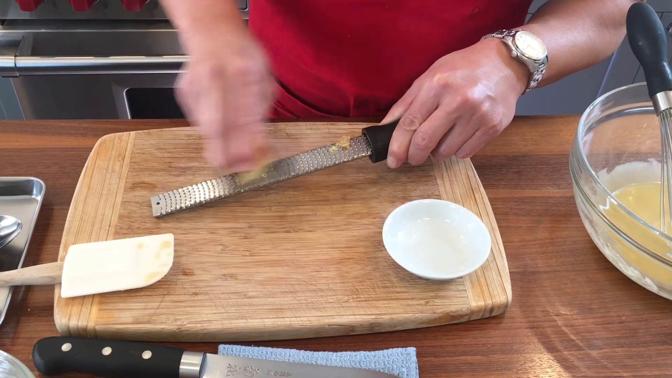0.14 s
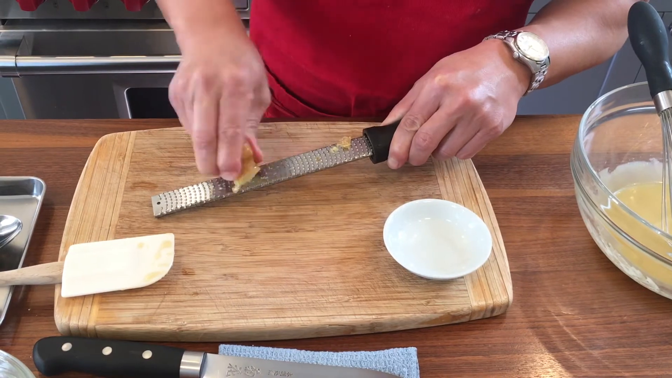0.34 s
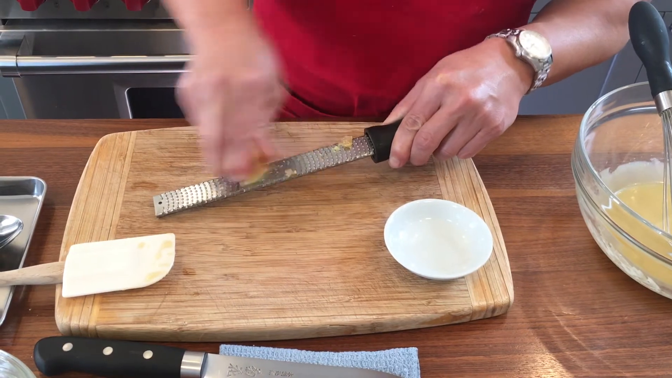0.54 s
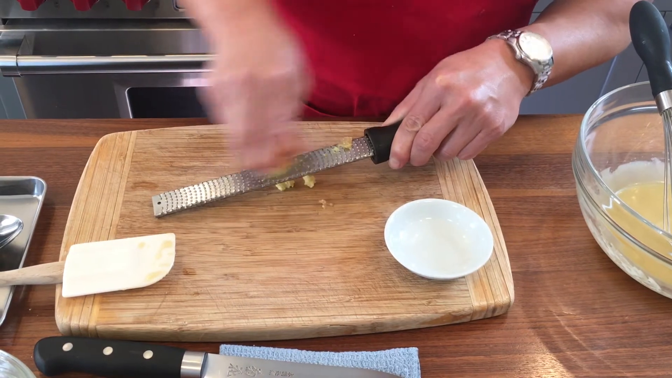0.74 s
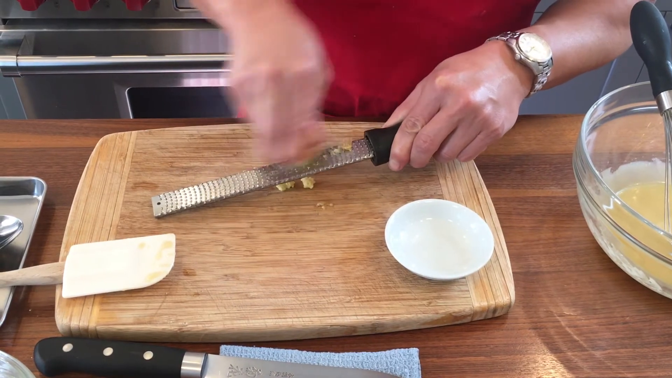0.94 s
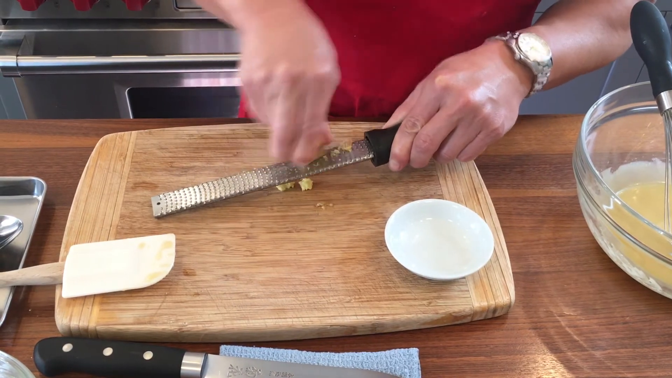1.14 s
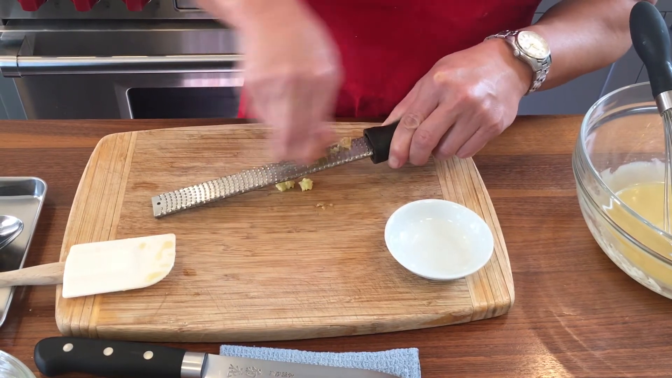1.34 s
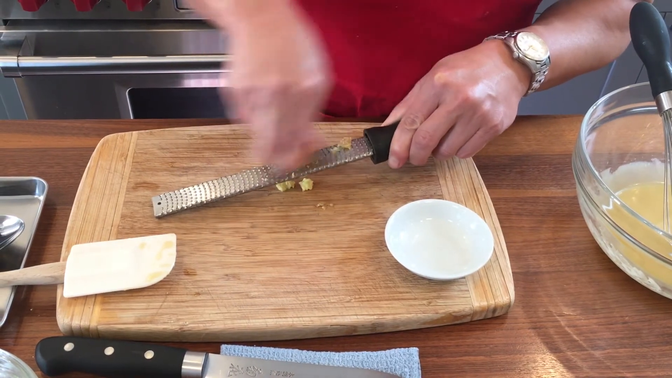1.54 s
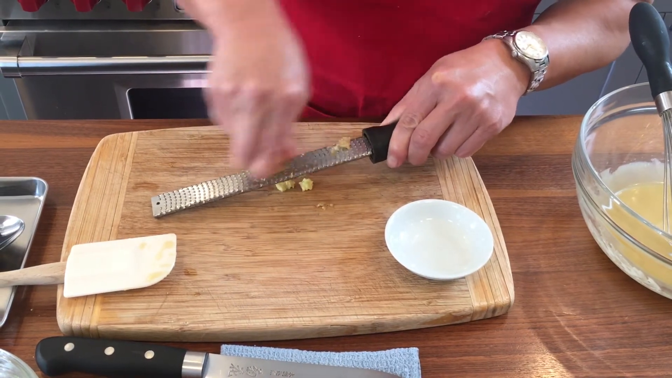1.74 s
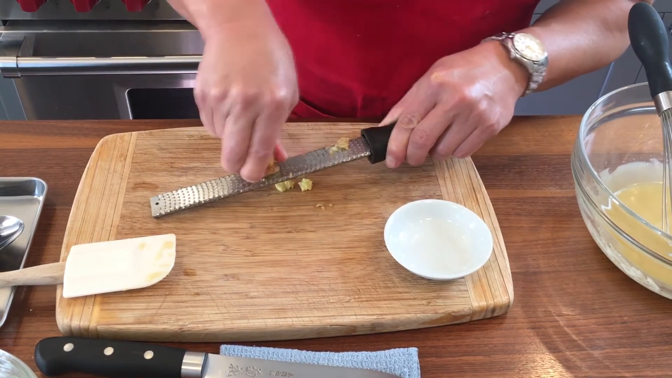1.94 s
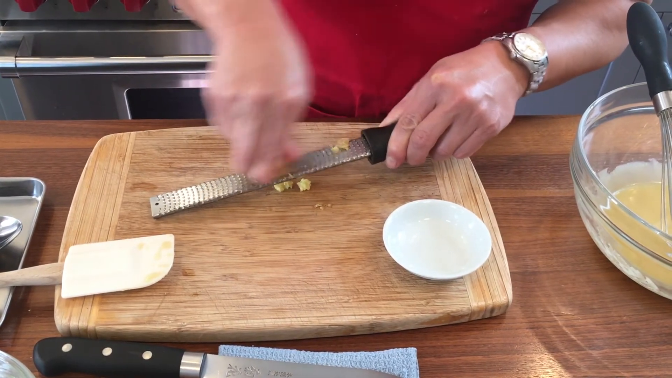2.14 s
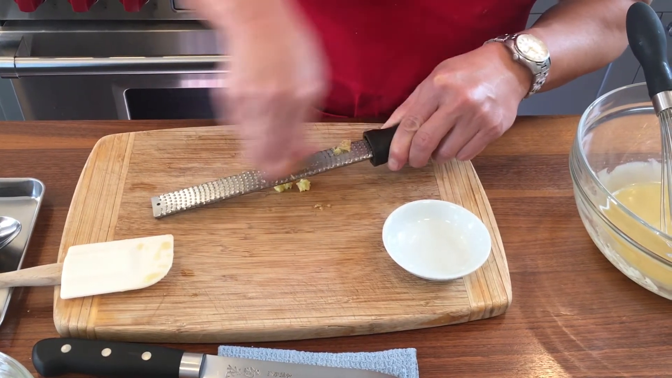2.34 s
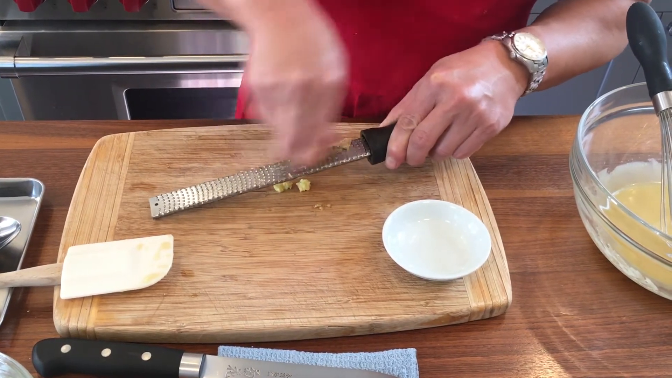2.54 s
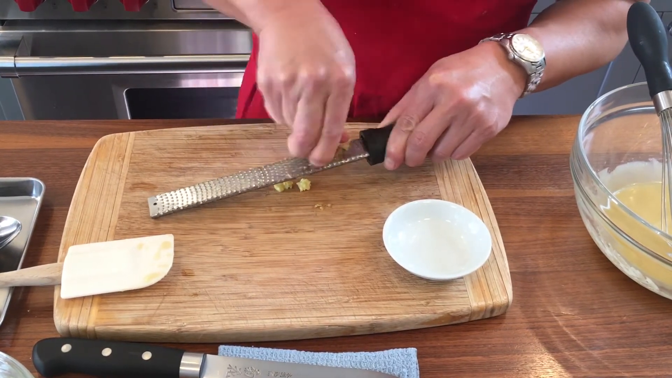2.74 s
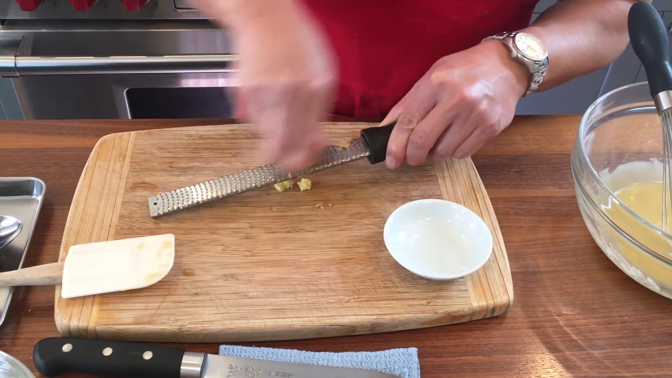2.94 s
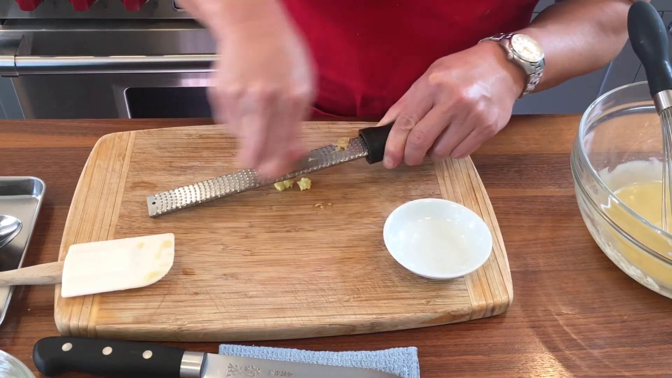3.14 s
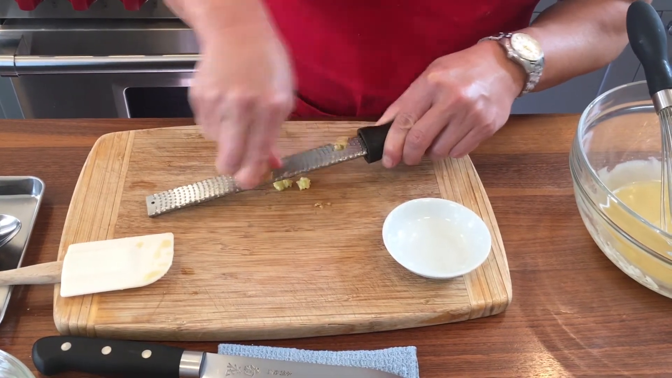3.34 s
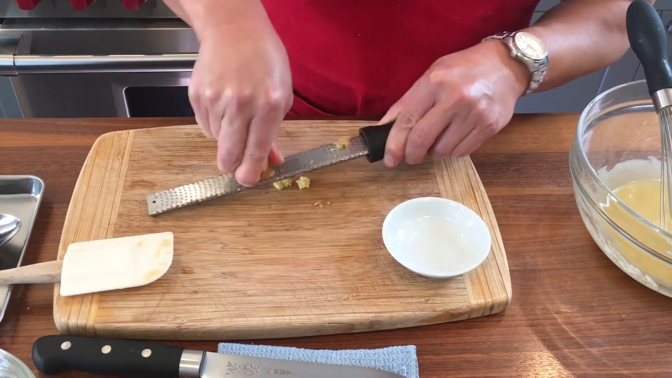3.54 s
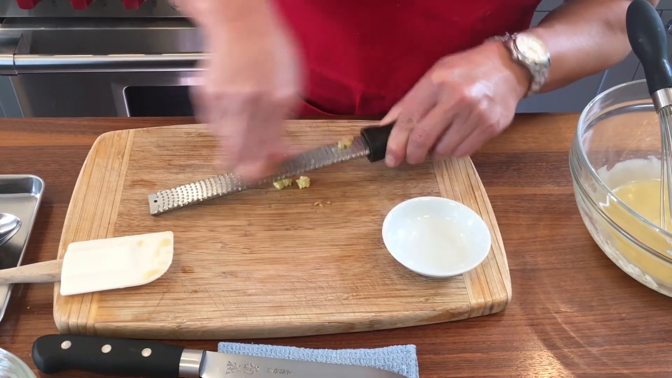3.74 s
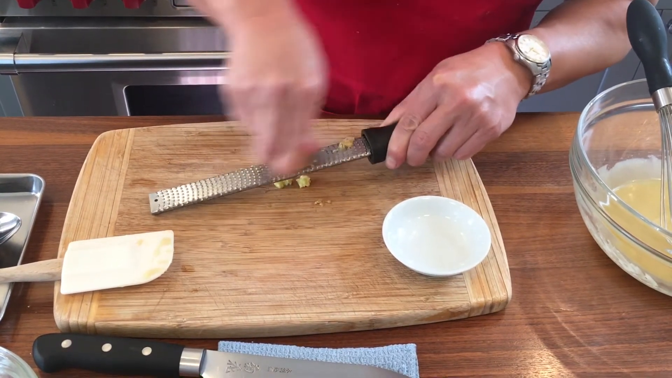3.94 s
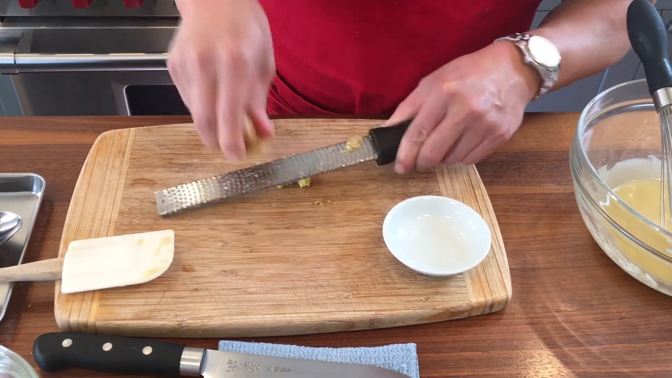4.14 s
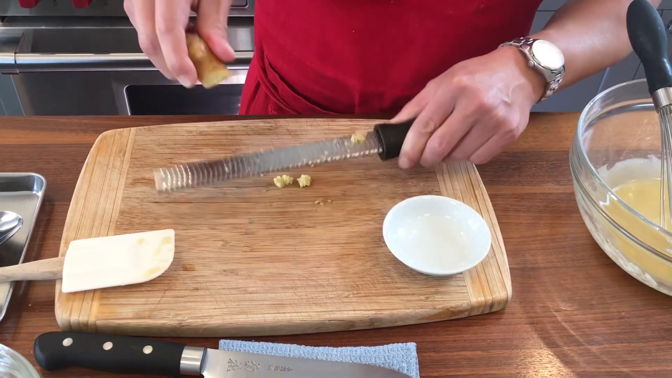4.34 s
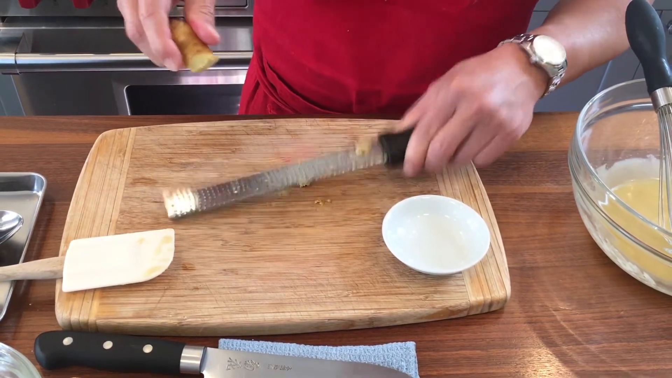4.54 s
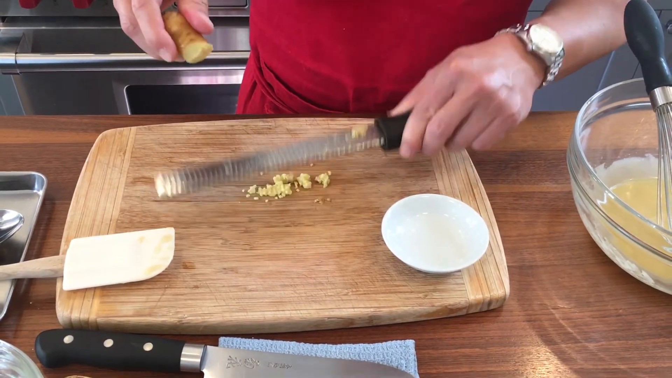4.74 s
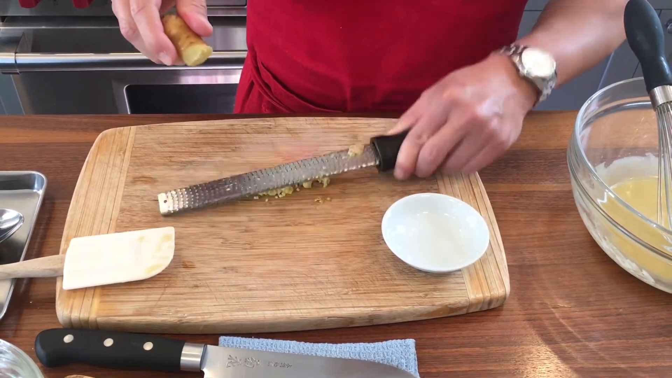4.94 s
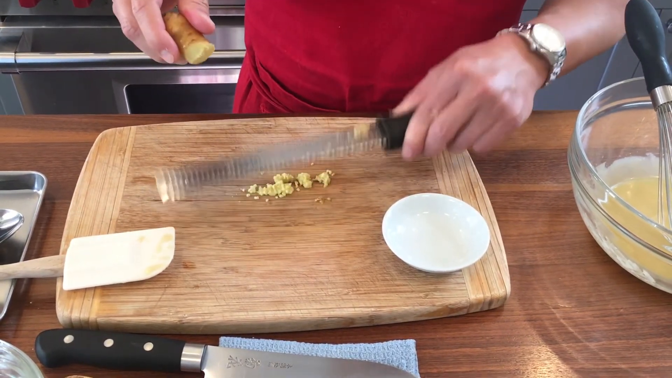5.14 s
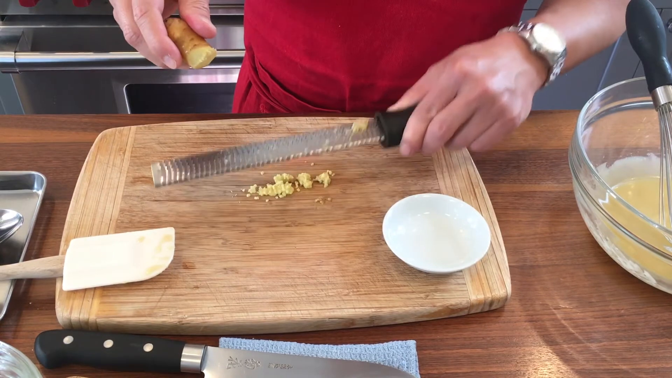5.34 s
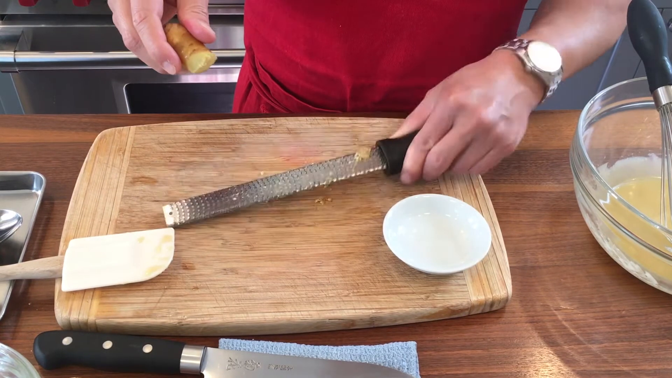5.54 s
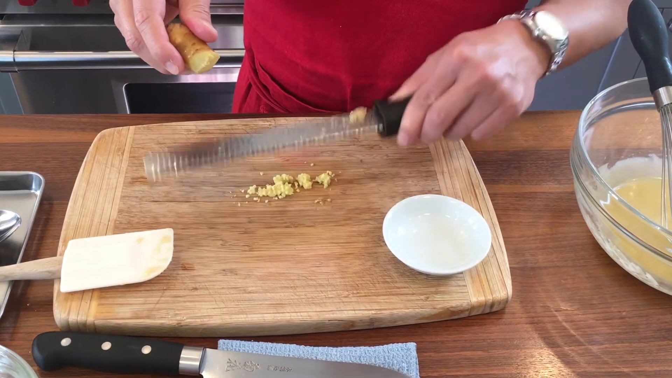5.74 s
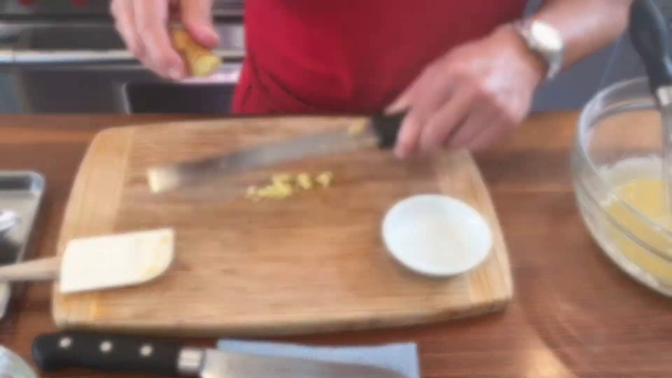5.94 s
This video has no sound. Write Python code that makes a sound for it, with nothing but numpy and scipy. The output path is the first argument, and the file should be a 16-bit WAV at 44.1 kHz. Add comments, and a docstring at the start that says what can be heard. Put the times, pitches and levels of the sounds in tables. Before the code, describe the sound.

Close in a small, reflective kitchen with a faint hum and soft air noise, ginger is rubbed quickly back and forth on a metal rasp resting on a wooden board. Bright crunchy pushes alternate with duller returns, about four or five pushes a second. The rubbing stops, then six much louder knocks of the steel blade on wood follow, clattery and briefly ringing, ending in a low handle bump.

```python
"""A low hum and soft air noise fill a small, live kitchen throughout.
A knob of ginger is rubbed back and forth on a steel rasp grater whose tip rests on a wooden board:
random clicks of snapping fibres, filtered, make a bright crunch on each push, a duller one on each return.
Late in the rubbing one tough fibre ticks, and then the ginger brushes the blade as it is lifted off.
Six knocks (dying sines, noise bursts, wall echoes) shake the pulp off; last the handle bumps the board."""
import sys
import numpy as np
from scipy import signal
from scipy.fft import rfft, irfft
from scipy.io import wavfile
from scipy.ndimage import uniform_filter1d

SR = 44100
rng = np.random.default_rng(int(sys.argv[2]) if len(sys.argv) > 2 else 0)


def to_wav(sig):
    """Store sig (one row per channel, or 1-D mono) as 16-bit WAV at the path in sys.argv[1].

    Samples outside -1..1 are clipped; the rate is SR.
    """
    pcm = np.clip(np.atleast_2d(sig), -1, 1) * 32767
    pcm = np.round(pcm).astype(np.int16)
    wavfile.write(sys.argv[1], SR, pcm.T)  # frames by channels


N = 269010  # length in samples, about 6.1 s

# Colour of snapping fibres. Each row: pitch in Hz, relative level in dB.
FIBRE_COLOUR = [(3000, -19), (4300, -0.5), (5100, -3), (6000, 1), (7200, 0), (8100, -5.5), (9200, -1),
                (10400, -11.5), (12000, -3.5), (16000, -6.5)]
# Ringing pitches of the board on the counter.
# Each row: pitch in Hz, relative level in dB, time to die by 60 dB in seconds.
BOARD_MODES = [(87.4, -10.5, 0.08), (116.7, -13.5, 0.095), (139, -6, 0.14), (188.6, -1, 0.08),
               (296, -10.5, 0.049), (481, -4.5, 0.025)]


def amp(db):
    """Turns decibels into a plain gain."""
    return 10 ** (np.asarray(db) / 20)


def unit(x):
    """Scales a sound to an rms (average strength) of 1."""
    return x / np.sqrt(np.mean(x ** 2) + 1e-20)


def read(points, hz):
    """Reads a table of pitch and value between its points, on a log-frequency axis."""
    f, value = np.transpose(points)
    return np.interp(np.log(hz + 1), np.log(f + 1), value)


def add(mix, s, sound):
    """Mixes a sound in at s seconds, cutting off what runs past the end."""
    part = mix[max(round(s * SR), 0):][:len(sound)]
    part += sound[:len(part)]


def colour(x, points, peaks=(), size=4096):
    """Filters with a broad spectrum and resonant peaks; the filter has unit energy and no pre-echo."""
    hz = abs(np.fft.fftfreq(size, 1 / SR))
    db = read(points, hz)
    for f, width, lift in peaks:
        db = db + lift / (1 + (2 * (hz - f) / width) ** 2)
    # minimum phase: the response starts at once and puts its energy as early as it can
    spectrum = np.exp(np.conj(signal.hilbert(np.log(amp(db)))))
    taps = np.fft.ifft(spectrum).real[:size // 2]
    return signal.oaconvolve(x, taps / np.linalg.norm(taps))[:len(x)]


def resonate(x, hz, width):
    """A resonance of gain 1, width in Hz, whose pitch follows the curve hz."""
    turn = np.exp(2j * np.pi * np.cumsum(hz * np.ones(len(x))) / SR)
    r = np.exp(-np.pi * width / SR)
    # shift the pitch down to zero, smooth, and shift it back up
    smooth = signal.lfilter([1 - r], [1, -r], x / turn + 1e-18)
    return 2 * (turn * smooth).real


def wander(length, per_s):
    """Random drift: straight lines between per_s random values a second."""
    return np.interp(np.arange(length) * per_s / SR, np.arange(4096), rng.standard_normal(4096))


def ring(modes, t, detune=0.):
    """A struck body's dying sines, each with a random sign and, where detune is set, a slightly random pitch."""
    signs = rng.choice([-1, 1], len(modes))
    shifts = 1 + detune * rng.standard_normal(len(modes))
    total = 0
    for (hz, db, t60), sign, shift in zip(modes, signs, shifts):
        fading = amp(db - 60 * t / t60)
        total = total + sign * fading * np.sin(2 * np.pi * hz * shift * t)
    return total


def chatter(t, length_s):
    """A quick run of contacts along the blade, of unit energy, driving all pitches about equally."""
    burst = rfft(rng.standard_normal(len(t)) * t * np.exp(-2 * t / length_s))
    # every pitch equally strong, phases kept; the fade below trims the spread in time
    flat = burst / (abs(burst) + 1e-12)
    even = irfft(flat, len(t)) * np.exp(-(t / (4 * length_s)) ** 2)
    return even / np.linalg.norm(even)


def background():
    """Low ventilation noise is filtered random noise; an appliance hum is a sine that wavers."""
    # Colour of the still air. Each row: pitch in Hz, relative level in dB.
    air_colour = [(20, -11.5), (35, -4), (55, 1.5), (85, -9.5), (120, -4.5), (190, 1.5), (260, -7.5),
                  (400, -7.5), (520, -15.5), (750, -22), (1300, -20.5), (2500, -28.5), (6000, -35),
                  (15000, -41.5)]
    air_db, hum_hz, hum_db = -65, 122.3, -71  # centres of the drifts
    air = amp(air_db) * unit(colour(rng.standard_normal(N), air_colour))
    air = air * amp(0.86 * wander(N, per_s=17))
    phase = 2 * np.pi * hum_hz * np.arange(N) / SR + 0.48 * wander(N, per_s=3.54)
    hum = np.sqrt(2) * np.sin(phase)
    return air + hum * amp(hum_db + 1.4 * wander(N, per_s=4.8))


def kitchen(x, wet_db, gap_s=.005):
    """Adds dense wall reflections after a short gap, each pitch band dying at its own speed."""
    # Echo length. Each row: pitch in Hz, time to die by 60 dB in seconds.
    echo_times = [(100, 0.44), (300, 0.2), (700, 0.54), (1300, 0.36), (2500, 0.42), (5000, 0.35),
                  (9000, 0.27), (15000, 0.25)]
    # How much the walls return. Each row: pitch in Hz, relative level in dB.
    wall_levels = [(100, -0.5), (600, 3.5), (1300, 0.5), (2500, 1.5), (3500, -2.5), (6000, -8.5),
                   (14000, -5.5)]
    reflections = rng.choice([-1., 1.], SR) * (rng.random(SR) < 12000 / SR)
    hz, t, bands = signal.stft(reflections, SR, nperseg=256)
    fade = amp(-60 * t / read(echo_times, hz)[:, None])
    returned = amp(read(wall_levels, hz))[:, None]
    tail = signal.istft(bands * fade * returned, SR, nperseg=256)[1]
    out = x.copy()
    add(out, gap_s, amp(wet_db) * signal.oaconvolve(x, tail / np.linalg.norm(tail)))
    return out


def knock(level_db, crack_db, thump_db, clack_db, hz, lift_db, rebound_s, rebound_db):
    """The blade slaps down along its length, rings, rebounds once and buzzes against the wood."""
    # Ringing pitches of the grater.
    # Each row: pitch in Hz, relative level in dB, time to die by 60 dB in seconds.
    grater_modes = [(919, -20, 0.22), (1020.4, -12.5, 0.27), (1118, -14.5, 0.13), (1277, -6, 0.12),
                    (1322, -21.5, 0.65), (1361, -7, 0.21), (1455.5, 0, 0.062), (1698, -15.5, 0.13),
                    (1722, 4.5, 0.017), (2008, -12, 0.047), (2223, -1.5, 0.032), (2310, -12, 0.18),
                    (2560, -14.5, 0.36), (2670, -4, 0.039), (3070, -8, 0.024), (3290, 5, 0.022),
                    (3580, -10.5, 0.18), (4216, -1.5, 0.031), (5350, -9.5, 0.03), (6360, -2, 0.028),
                    (6740, -3.5, 0.02), (6810, -11, 0.019)]
    # Colour of steel slapping wood. Each row: pitch in Hz, relative level in dB.
    slap_colour = [(200, -7), (650, -15.5), (900, -4), (1400, 0.5), (2600, 0), (3700, -4), (4800, -5.5),
                   (7100, -7.5), (7800, -13), (11000, -19.5), (16000, -24)]
    t = np.arange(SR // 2) / SR
    slap = amp(crack_db - 1.5) * chatter(t, length_s=0.0036)
    buzz = amp(crack_db - 9.5) * chatter(t, length_s=0.012)
    contacts = slap + buzz
    add(contacts, rebound_s, amp(rebound_db + 1.5) * chatter(t, length_s=0.0015))
    ringing = amp(-27.5) * ring(grater_modes, t, detune=0.0019) * (1 - np.exp(-t / 0.00052))
    steel = ringing + colour(contacts, slap_colour)
    # the contact point favours one pitch, a flat landing adds a hollow clack
    steel = steel + (amp(lift_db) - 1) * resonate(steel, hz, width=430)
    steel = steel + (amp(clack_db) - 1) * resonate(steel, hz=870, width=790)
    wood = amp(thump_db - 27.5) * ring(BOARD_MODES, t) * (1 - np.exp(-t / 0.0015))
    return amp(level_db) * steel + wood


def knocking():
    """Six knocks, each with its own randomly drawn wall echoes."""
    # The knocks. Each row: start in seconds, level of the steel in dB, crack in dB, thump in dB,
    # hollow clack of a flat landing in dB, pitch favoured by the contact point in Hz, its lift in dB,
    # rebound delay in seconds, rebound in dB. knock() trims crack, thump and rebound.
    knocks = [(4.5548, -5.5, 1, -3, 0.5, 1290, 3.5, 0.0072, -9.5),
              (4.8728, -3.5, 2, -6, 4, 2150, 1.5, 0.0099, -4.5),
              (5.1814, -1, -1.5, -5, -4, 1670, 4.5, 0.0065, -15.5),
              (5.4699, 0.5, -1, -2.5, 0, 1400, 2.5, 0.012, -14.5),
              (5.7620, -4, 4.5, -1.5, 2.5, 2670, 3.5, 0.0079, -16),
              (6.0326, 0, -0.5, -3.5, -3.5, 1590, 3, 0.0076, -13.5)]
    out = np.zeros(N)
    for s, *blow in knocks:
        add(out, s, kitchen(knock(*blow), wet_db=-8.5))
    return out


def board_bumps():
    """Low bumps of the board: soft as the grater shifts or is lifted, a stronger last one as its handle lands."""
    # The bumps. Each row: start in seconds, level in dB.
    bumps = [(1.222, -47), (1.405, -45), (1.51, -47.5), (1.789, -49), (2.227, -50), (2.757, -48),
             (3.975, -50.5), (4.106, -47.5), (4.22, -49.5), (6.068, -29)]
    out, t = np.zeros(N), np.arange(SR // 4) / SR
    for s, db in bumps:
        gradual_start = 1 - np.exp(-t / 0.0062)
        add(out, s, amp(db) * ring(BOARD_MODES, t, detune=0.022) * gradual_start)
    return out


def tick(start_s=3.582, level_db=-41):
    """A single tough fibre gives way: one short burst with the fibres' colour."""
    out, t = np.zeros(N), np.arange(SR // 20) / SR
    add(out, start_s, amp(level_db) * colour(chatter(t, length_s=.001), FIBRE_COLOUR))
    return out


def strokes():
    """The hand's to and fro: pushes cut against the teeth, returns slide over them, then the lift-off."""
    # The pushes. Each row: start in seconds, length in seconds, level in dB.
    pushes = [(0.0, 0.085, -57), (0.26, 0.084, -55.5), (0.484, 0.072, -55), (0.71, 0.066, -57),
              (0.931, 0.069, -58.5), (1.157, 0.072, -62), (1.399, 0.062, -58.5), (1.621, 0.083, -61.5),
              (1.858, 0.066, -61.5), (2.093, 0.066, -61.5), (2.32, 0.06, -59.5), (2.544, 0.071, -61.5),
              (2.778, 0.083, -61), (3.016, .067, -61), (3.243, 0.075, -62), (3.468, 0.069, -62),
              (3.699, 0.075, -60), (3.919, 0.11, -63.5)]
    # Weight of the hand on returns, heavy then light. Each row: time in seconds, level in dB.
    return_weight = [(.15, -58), (.38, -56.5), (.75, -63), (1.1, -64), (2.2, -64), (3.15, -63.5),
                     (3.8, -61.5)]
    # The ginger brushes the blade as it is lifted off. One row, like every row made here:
    # start in seconds, end in seconds, added rise time in seconds, level in dB,
    # sharpness against that level in dB, board rumble in dB. grating() trims the levels.
    lift_off = (4.202, 4.232, 0, -71.5, -4.5, -65.5)
    # a push catches at once, a return starts gently: added rise time in seconds
    push_ease_s, return_ease_s = 0.00089, 0.0059
    # dB against the stroke's level
    push_sharp_db, push_rumble_db = -0.82, -1.5
    return_sharp_db, return_rumble_db = -6, -5.5
    # each return fills this part of the time from one push to the next
    return_span = np.array([0.53, .85])

    rows = [(s, s + length, push_ease_s, db, push_sharp_db, db + push_rumble_db)
            for s, length, db in pushes]
    for (s, *_), (next_s, *_) in zip(pushes, pushes[1:]):
        start, end = s + (next_s - s) * return_span
        db = np.interp(start, *np.transpose(return_weight))
        rows.append((start, end, return_ease_s, db, return_sharp_db, db + return_rumble_db))
    return rows + [lift_off]


def pressure(levels_db, rise_s, fall_s, arch_db=0):
    """The hand's force builds at the start of each stroke, swells midway by arch_db and eases off."""
    force = np.zeros(N)
    for (start, end, ease_s, *_), db in zip(strokes(), levels_db):
        t = np.arange(max(start - .1, 0), end + .2, 1 / SR)
        speed = np.sin(np.pi * np.clip((t - start) / (end - start), 0, 1))
        rise = 1 + np.tanh((t - start) / (rise_s + ease_s))
        fall = 1 - np.tanh((t - end) / fall_s)
        swell = arch_db * (speed - 2 / np.pi)  # 2 / pi is the mean speed
        add(force, t[0], amp(db + swell) * rise * fall / 4)
    return force


def snaps(per_s, spread_db, clump_db):
    """Fibres snapping on the teeth: tiny clicks of uneven size that come in clumps."""
    size = amp(spread_db * np.minimum(rng.exponential(1, N), 4))
    clicks = size * rng.choice([-1, 1], N) * (rng.random(N) < per_s / SR)
    return unit(clicks * amp(clump_db * wander(N, per_s=330)))


def roam(x, patchy_db):
    """As the ginger travels along the blade it drives its many resonances by changing amounts."""
    bands = signal.stft(x, nperseg=512, noverlap=384)[2]
    patches = rng.standard_normal(bands.shape)
    patches = uniform_filter1d(patches, size=4, axis=0)  # smooth over pitch
    patches = unit(uniform_filter1d(patches, size=9, axis=1))  # smooth over time
    return signal.istft(bands * amp(patchy_db * patches), nperseg=512, noverlap=384)[1][:N]


def teeth(width_hz=650, glide_hz_per_s=4000, swell_s=0.02):
    """The teeth zing as the ginger first bites, rising a little as the hand speeds up."""
    # The zing drops in pitch as pulp loads the blade.
    # Each row: time in seconds, starting pitch in Hz, level against the stroke in dB.
    zing = [(0, 4080, -3.5), (0.501, 4090, -1), (1.0, 4100, -1), (1.5, 3770, -6.5), (2.3, 3370, -14.5),
            (3.35, 3450, -9.5), (4.2, 3420, -23)]
    when, pitch, lift = np.transpose(zing)
    out, t = np.zeros(N), np.arange(SR // 8) / SR
    for start, _, _, level_db, *_ in strokes():
        hz = np.interp(start, when, pitch) + glide_hz_per_s * t
        bite = resonate(rng.standard_normal(len(t)), hz, width_hz)
        bite = unit(resonate(bite, hz, width_hz))
        swell = t / swell_s * np.exp(1 - t / swell_s)
        add(out, start - .004, amp(level_db + np.interp(start, when, lift)) * bite * swell)
    return out


def grating():
    """Snapping fibres drive the blade, which shakes the board."""
    # Colour of the blade under the ginger. Each row: pitch in Hz, relative level in dB.
    blade_colour = [(300, -5.5), (700, -9), (900, -6), (1400, 0), (1850, -1.5), (2300, -1.5), (2650, -4),
                    (2920, -7.5), (3400, 2), (4000, -5), (4600, -6.5), (5200, -18), (8000, -21)]
    # Resonances of the blade under the ginger. Each row: pitch in Hz, width in Hz, lift in dB.
    blade_peaks = [(1170, 28, 0.5), (1530, 200, 2), (2290, 100, 4), (3520, 190, 2.5), (4640, 140, 5.5)]
    # Colour of the board under the grater. Each row: pitch in Hz, relative level in dB.
    board_colour = [(50, -15), (110, -11.5), (165, -4.5), (195, 5), (250, -12.5), (300, -2), (350, -8.5),
                    (410, -1), (470, -16.5), (800, -30)]
    *_, level_db, sharp_db, rumble_db = np.transpose(strokes())

    crunch = snaps(per_s=5000, spread_db=1.5, clump_db=2.0)
    rubbing = pressure(level_db - 1.22, rise_s=0.0067, fall_s=0.0042, arch_db=1.0)
    blade = roam(colour(crunch, blade_colour, blade_peaks), patchy_db=2.0)
    rasp = unit(blade) * rubbing

    cutting = pressure(level_db + sharp_db - .8, rise_s=0.003, fall_s=0.013, arch_db=1.0)
    # torn fibres drag on through the turn
    cutting += pressure(level_db + sharp_db - 12.5, rise_s=0.0091, fall_s=0.11)
    fibres = colour(snaps(per_s=8300, spread_db=2.5, clump_db=1.5), FIBRE_COLOUR)
    fizz = unit(fibres) * cutting

    shaking = pressure(rumble_db - 3.0, rise_s=0.022, fall_s=0.019)
    rumble = unit(colour(crunch, board_colour)) * shaking
    return rasp + fizz + rumble + teeth() + tick() + board_bumps()


def scene():
    """Still air, knocks, board bumps and grating, heard by one microphone."""
    return (kitchen(grating(), wet_db=-9) + knocking() + background())[None]


def record(dry):
    """The microphone's bass roll-off, then a limit on the highest treble."""
    low_cut_hz, edge_hz = 70.5, 16000
    bass_cut = signal.butter(2, low_cut_hz, "highpass", fs=SR, output="sos")
    thin = signal.sosfilt(bass_cut, dry)
    treble_cut = signal.firwin(511, edge_hz, window=("kaiser", 9), fs=SR)
    return signal.oaconvolve(thin, treble_cut[None], "same")


dry = scene()
out = record(dry)
to_wav(out)
```